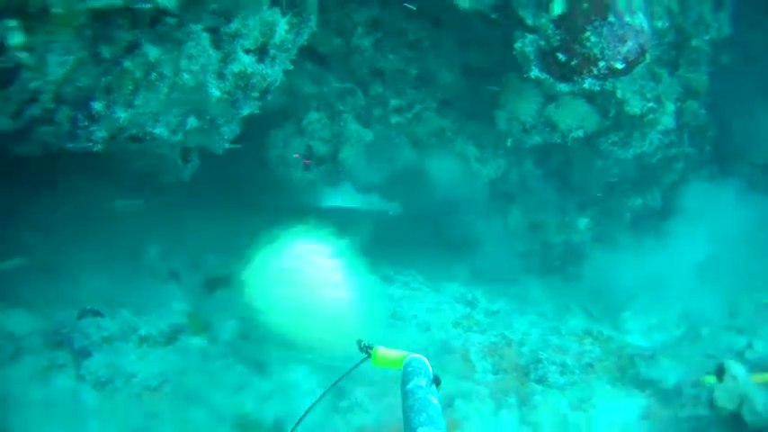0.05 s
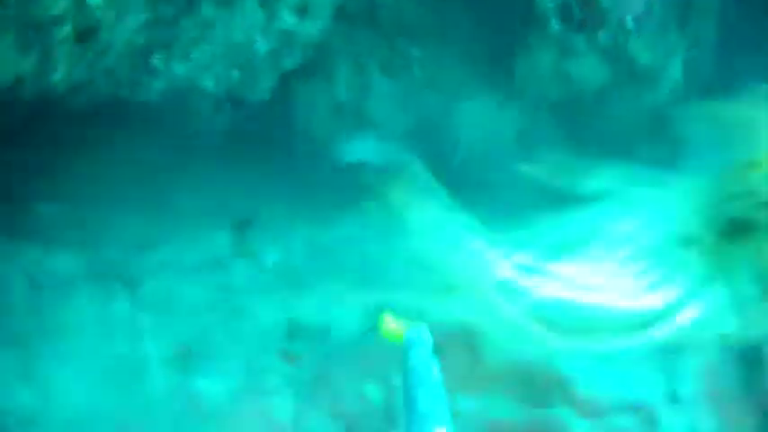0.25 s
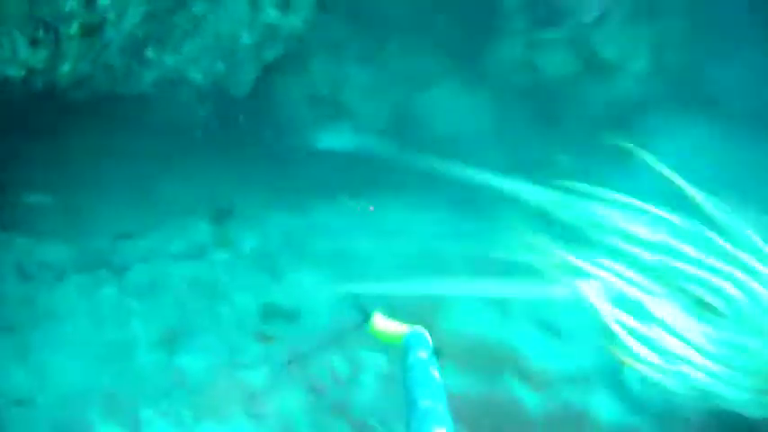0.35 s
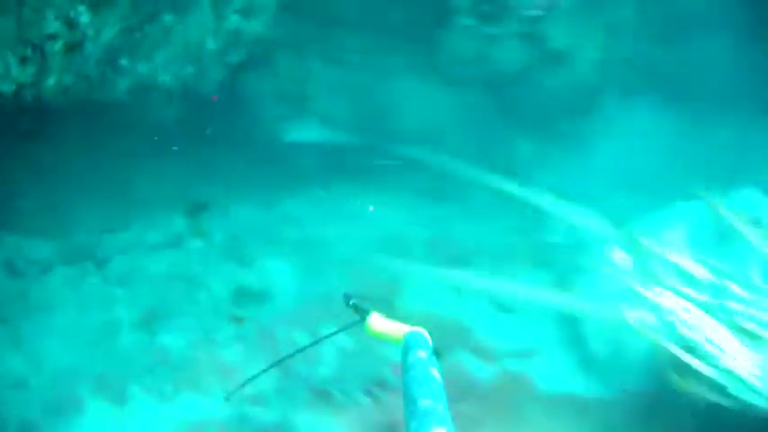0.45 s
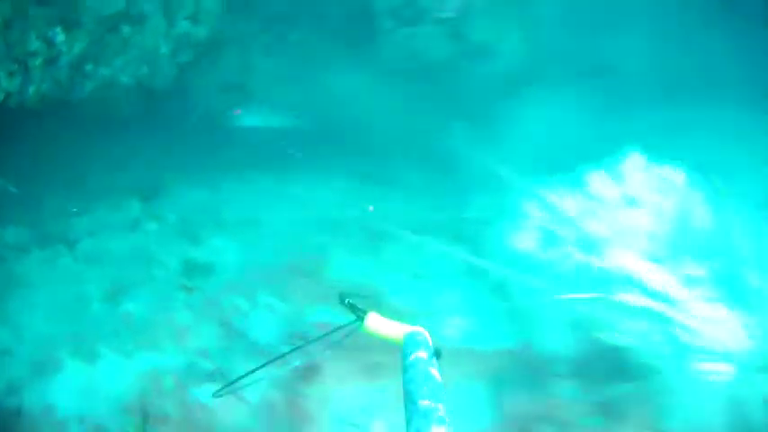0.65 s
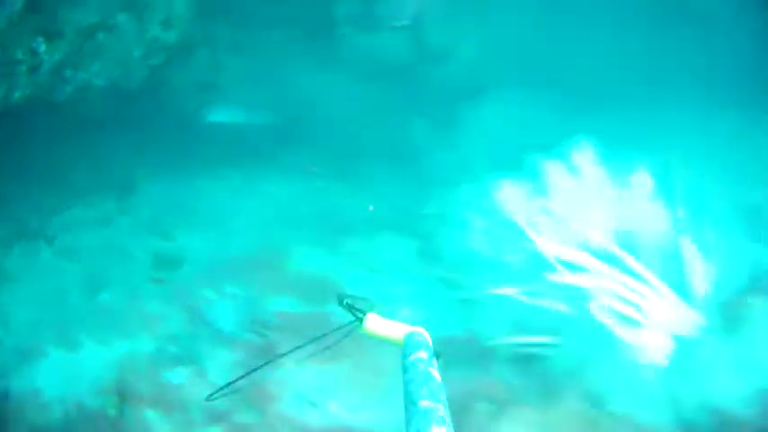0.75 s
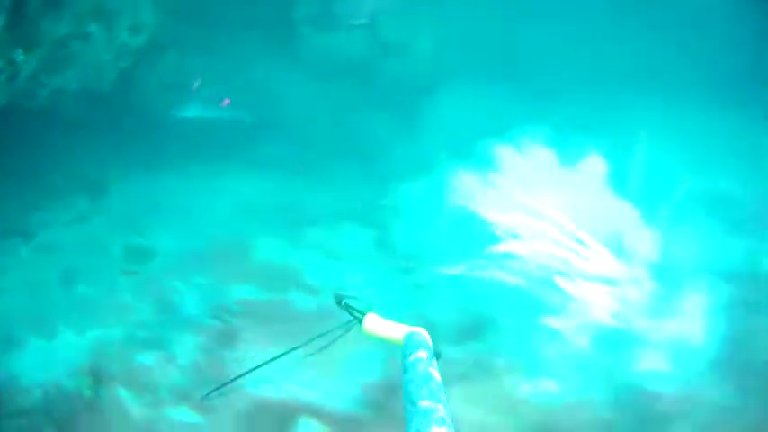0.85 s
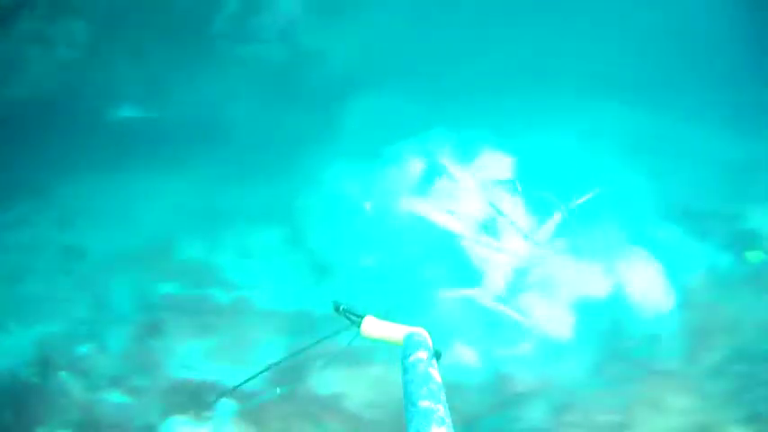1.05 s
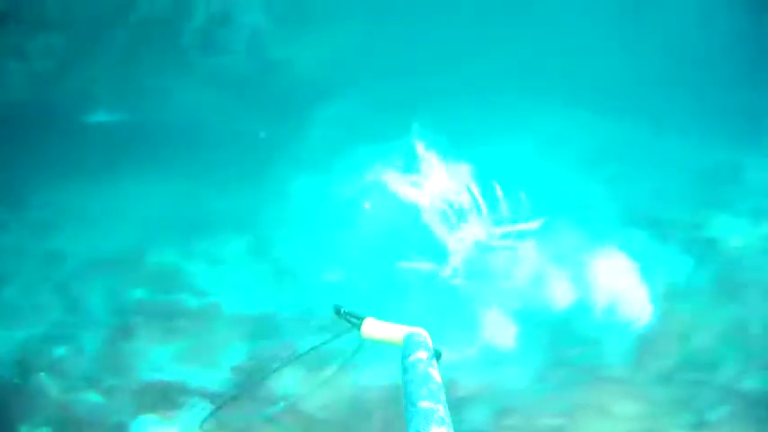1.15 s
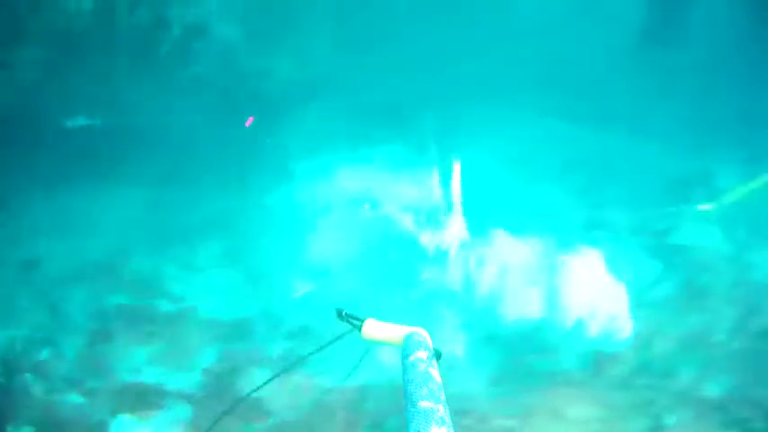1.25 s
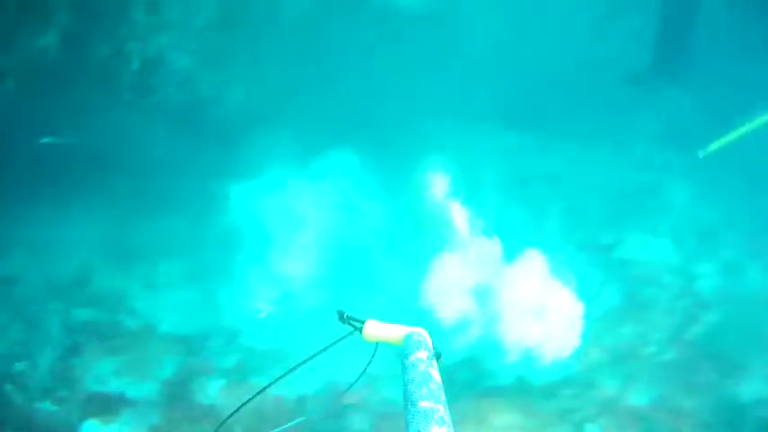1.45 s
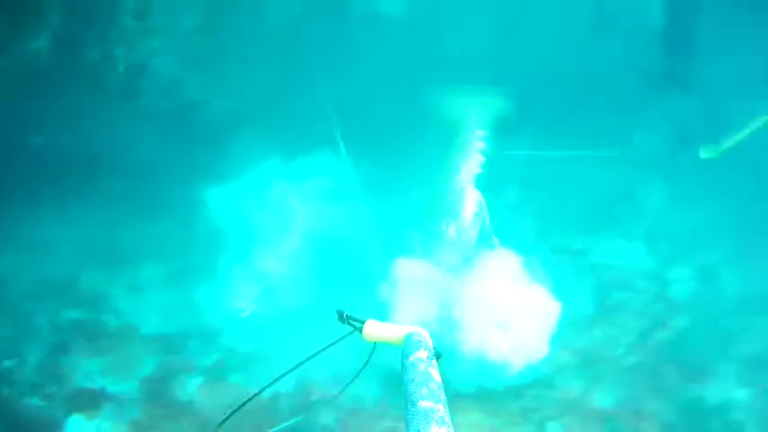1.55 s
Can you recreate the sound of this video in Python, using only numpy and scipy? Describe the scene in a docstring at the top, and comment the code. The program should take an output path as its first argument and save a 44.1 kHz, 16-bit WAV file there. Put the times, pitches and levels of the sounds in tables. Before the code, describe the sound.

A violent underwater thrash thumps a pole, followed by snaps, rustles and ratcheting line.

```python
"""Under water, beside a camera on a pole with a snare line, over the faint crackle of the seabed.
The gear scrapes; at 0.2 s a violent thrash knocks the pole, shoves water against the housing and
thumps it, overloading the microphone. A sharp snap follows at 0.4 s, then pinging rubs, dry cracks
and scattered bubbles. From 1 s on the line is dragged out in three short ratcheting runs, with gritty
rustles and a cluster of smaller snaps before the last run."""
import sys
import numpy as np
from scipy import signal
from scipy.fft import rfft, irfft
from scipy.io import wavfile
from scipy.ndimage import uniform_filter1d

SR = 44100
rng = np.random.default_rng(int(sys.argv[2]) if len(sys.argv) > 2 else 0)


def output_pcm(signal):
    """Save a mono or channel-first signal as 16-bit PCM at the path in sys.argv[1].

    Samples are clipped to [-1, 1] before scaling.
    """
    pcm = np.clip(np.atleast_2d(signal).T, -1, 1) * 32767
    wavfile.write(sys.argv[1], SR, np.round(pcm).astype(np.int16))


N = 70560
T = np.arange(N) / SR

# soft wash of the seabed (frequency [Hz], gain [dB])
SEA_EQ = [(180, -25.5), (400, -25), (650, -8.5), (1000, 9), (1400, -11.5), (2100, 2), (2700, -9.5),
          (5500, -4.5), (7200, -8), (10000, -17), (12500, -11), (16000, -39)]
# hollow ring of the housing (frequency [Hz], level [dB], decay [s])
HOUSING_MODES = [(892, -37.5, 0.008), (1048, -36, 0.014), (6780, -33, 0.0011), (8340, -35, 0.0016)]
# ring of the pole and its fittings (frequency [Hz], relative level [dB], decay [s])
POLE_MODES = [(668.3, -38, 0.016), (914, -51.5, 0.014), (1627, -48, 0.01), (1840, -56, 0.0063),
              (2220, -44, 0.0074), (4000, -43.5, .006), (5100, -46.5, 0.0044)]
# stereo lean (frequency [Hz], left minus right [dB])
BALANCE = [(60, -5.5), (110, -8), (200, 4.5), (380, 9), (700, 11), (1290, 6.5), (2380, 6.5), (4400, 6),
           (8120, 5.5), (15000, 2)]
# bubble plops and short ringing pings of knocks and rubs (time [s], level [dB], pitch [Hz], decay [s])
PLOPS_AND_PINGS = [(0.119, -50.5, 1096, 0.0057), (.291, -24, 1815, 0.0039), (.513, -35, 2014, 0.0024),
                   (.533, -34, 2230, 0.0025), (.595, -46.5, 381, 0.028), (0.655, -33, 1152, 0.0055),
                   (.663, -42.5, 984, 0.0042), (.707, -44, 2170, 0.0037), (.714, -44.5, 1075, 0.0069),
                   (.716, -51, 675, 0.0081), (.8419, -40.5, 2000, 0.0024), (.895, -48.5, 710, .009),
                   (.95, -37, 2050, 0.0019), (1.11, -48, 374, 0.026), (1.224, -34.5, 2345, 0.0046),
                   (1.528, -41.5, 2346, 0.0025), (1.552, -58, 560, 0.015)]
# dry cracks of grit and shell (time [s], level [dB])
CRACKS = [(.029, -29), (.3215, -22), (.4195, -20.5), (.428, -38), (.4372, -24), (.5995, -21.5),
          (.6055, -18.5), (.618, -12.5), (.7315, -30.5), (.7935, -27.5), (.821, -38), (.8424, -31)]
# bright tone of a crack (frequency [Hz], gain [dB])
CRACK_EQ = [(500, -23.5), (2200, -3.5), (6500, 6), (9500, -18), (16000, -28)]
# snaps of line and shell (time [s], level [dB], pitch [Hz])
SNAPS = [(.116, -31.5, 2920), (.3903, -9, 3274), (1.3524, -24, 3230), (1.356, -33, 3220),
         (1.363, -33.5, 3400), (1.367, -33, 3600), (1.372, -37, 3460)]
# partials of a snap (multiple of the pitch, relative level [dB], decay [s])
SNAP_MODES = [(1.001, -3, 0.0012), (1.19, -9.5, 0.0012), (1.41, -14, .002), (1.61, -13, .002)]
# gritty rustles of the line (time [s], relative level [dB], hold [s], decay [s])
RUSTLES = [(.183, -31.5, 0.0014, 0.014), (.202, -32.5, 0.0069, 0.0026), (.284, -48.5, 0.078, 0.061),
           (.415, -51, 0.0083, 0.067), (.553, -48.5, 0.0051, 0.016), (.615, -40.5, 0.0067, 0.033),
           (.73, -53, 0.09, 0.0061), (.885, -54, 0.2, 0.014), (.988, -57, 0.042, 0.011),
           (1.019, -42.5, 0.048, 0.012), (1.1, -50.5, 0.22, 0.017), (1.252, -41, 0.029, 0.012),
           (1.347, -44.5, 0.017, 0.0058), (1.452, -39, 0.019, 0.01)]
# crisp tone of the rustles and the seabed crackle (frequency [Hz], gain [dB])
GRIT_EQ = [(200, -29), (500, -6.5), (950, -6), (1350, -14), (2100, 4), (2800, -6.5), (4200, -3),
           (5500, 3.5), (7000, 1.5), (9500, -11), (12500, -13), (16000, -33.5)]
# line and gear rubbing on the pole (time [s], relative level [dB], hold [s], decay [s])
RUBS = [(.035, -57, 0.058, 0.041), (.1825, -28, 0.0059, 0.014), (.2, -22.5, 0.02, .006),
        (.221, -27, 0.0033, 0.0028), (.265, -26.5, 0.0073, 0.011), (.291, -29, 0.0012, 0.0017),
        (.312, -34.5, 0.0088, .004), (.331, -35.5, .008, 0.0061), (.513, -37, 0.0023, 0.0059),
        (.533, -38.5, 0.0028, 0.0056), (.548, -41.5, 0.0017, 0.02), (.575, -43.5, 0.0088, 0.0093),
        (.599, -40.5, 0.022, 0.012), (1.11, -35.5, 0.00088, 0.0053), (1.128, -46.5, 0.011, 0.014),
        (1.16, -51, 0.0041, 0.0097)]
# scraping tone of a rub (frequency [Hz], gain [dB])
RUB_EQ = [(150, -20), (380, 1), (520, -3.5), (700, -28), (1150, -15.5), (1450, 3), (2200, 5.5),
          (2600, -6.5), (4200, -3.5), (7000, -9), (9000, -27), (13000, -40), (16000, -45.5)]
# single ticks as the line creeps (time [s], relative level [dB])
TICKS = [(.0695, -21), (.6545, -19), (.991, -24), (.997, -24), (1.0023, -28), (1.008, -22), (1.0123, -25),
         (1.0644, -18), (1.0707, -17), (1.0805, -25), (1.1444, -22), (1.1527, -22), (1.1596, -21),
         (1.2814, -19), (1.2882, -23), (1.2908, -22), (1.2957, -26), (1.3033, -24), (1.3064, -27),
         (1.3155, -26), (1.4419, -22), (1.4529, -21), (1.4564, -19), (1.4619, -12), (1.4673, -17),
         (1.5174, -27)]
# runs of the line (start [s], end [s], first rate [ticks/s], last rate [ticks/s], relative level [dB])
RUNS = [(1.0211, 1.059, 325, 500, -14), (1.2518, 1.2765, 410, 455, -14), (1.4742, 1.51, 310, 225, -16)]
# thin, glassy tone of a tick (frequency [Hz], gain [dB])
TICK_EQ = [(200, -55), (600, -29.5), (900, -32), (1350, -22), (2200, -3), (2650, -16.5), (3100, -2.5),
           (4400, -18.5), (5100, 4), (5700, 1.5), (6100, -2.5), (6600, 6.5), (7200, 4.5), (7750, -13.5),
           (8300, -1), (9200, -9.5), (11000, -22.5), (12100, -5), (13200, -18), (16000, -23)]
# tugs on the pole (time [s], level [dB])
TUGS = [(0.249, -21), (0.628, -48.5), (1.11, -54)]
# envelopes of water shoved against the housing (time [s], rumble level [dB], churn level [dB])
SURGE = [(0, -65, -62), (.1, -68, -61.5), (0.179, -70, -70.5), (.187, -35.5, -22), (0.204, -27.5, -27),
         (0.23, -26, -24), (.24, -16, -8.5), (.256, -18, -23), (.275, -23, -31.5), (.305, -39, -38.5),
         (.37, -38, -47), (.47, -59, -72), (.645, -55, -63), (.72, -59.5, -83), (.95, -61.5, -77),
         (1.13, -60.5, -70.5), (1.22, -63, -85), (1.6, -70.5, -79)]
# deep rumble of that water (frequency [Hz], gain [dB])
RUMBLE_EQ = [(12, -9), (27, 1), (60, 0), (85, -2), (125, -14), (300, -45), (3000, -110)]
# its low-mid churn (frequency [Hz], gain [dB])
CHURN_EQ = [(60, -19.5), (140, 2), (260, 0), (400, -8), (560, -13.5), (800, -26), (3000, -42),
            (16000, -100)]
# body of the heavy thump (frequency [Hz], level [dB], decay [s])
THUMP_MODES = [(48, 7.5, 0.011), (121.5, -8.5, 0.011), (205, -7, 0.0065)]
# hard knocks of the thrash (time [s], relative level [dB], hold [s], decay [s])
KNOCKS = [(.2102, -19, 0.0019, 0.0022), (.2352, -17.5, 0.0011, 0.00089), (.2368, -5, 0.0023, 0.0026),
          (.2468, -5, 0.0017, 0.0027), (.2535, -18, 0.0021, 0.0016), (.2612, -11.5, 0.00055, 0.0011),
          (.276, -28, 0.00057, 0.00089), (.278, -21, 0.0011, .0018)]
# mid-heavy tone of a knock (frequency [Hz], gain [dB])
KNOCK_EQ = [(180, -41), (300, -4), (762, -12), (1030, 0.5), (1410, -11.5), (1580, -4), (1900, 1.5),
            (2740, -12), (4520, -9), (5160, -6), (5610, -9.5), (8090, -17), (8940, -37), (11500, -24),
            (16000, -53.5)]


def amp(db):
    """Decibels to gain."""
    return 10 ** (np.asarray(db) / 20)


def unit(x):
    """Scale to rms 1."""
    return x / np.sqrt(np.mean(x ** 2))


def curve(points, size):
    """Spread (frequency [Hz], gain [dB]) points over the bins of a transform."""
    hz, db = np.array(points, float).T
    return np.interp(np.log(np.fft.rfftfreq(size, 1 / SR) + 1), np.log(hz), db)


def through(x, response):
    """Pass a sound through an impulse response."""
    return signal.fftconvolve(x, response)[:N]


def eq(x, points, size=8192):
    """Minimum-phase EQ of unit energy: shapes the tone with no ringing ahead of a hit."""
    cepstrum = irfft(np.log(amp(curve(points, size))))[:size // 2]
    cepstrum[1:] *= 2
    response = irfft(np.exp(rfft(cepstrum, size)))
    return through(x, response / np.linalg.norm(response))


def pulses(rows):
    """One impulse for each (time [s], level [dB])."""
    out = np.zeros(N)
    for at, db in rows:
        out[int(at * SR)] += amp(db)
    return out


def ring(at, hz, db, decay, sag=0, attack_cycles=.67):
    """A damped tone that builds within its first cycle and loses the share `sag` of its pitch."""
    age = np.clip(T - at, 0, 10 * decay)
    fade = np.exp(-age / decay)
    attack = 1 - np.exp(-(age * hz / attack_cycles) ** 2)
    cycles = hz * (age - sag * (age - decay * (1 - fade)))
    return amp(db) * attack * fade * (age < 10 * decay) * np.sin(2 * np.pi * cycles)


def struck(modes, at=0):
    """All modes of a body ring from one hit."""
    return sum(ring(at, hz, db, decay) for hz, db, decay in modes)


def grit(per_s, spread_db):
    """Random tiny impacts of uneven size, rms 1."""
    size = amp(spread_db * np.minimum(rng.exponential(size=N), 3))
    return unit((rng.random(N) < per_s / SR) * size * rng.choice([-1, 1], N))


def bursts(rows, tone, per_s, spread_db, attack_s=.00024):
    """Spurts of stick-slip grit that rise, hold and die away."""
    envelope = np.zeros(N)
    for at, db, hold, decay in rows:
        attack = np.clip((T - at) / attack_s, 0, 1)
        envelope += amp(db) * attack * np.exp(-np.maximum(T - at - hold, 0) / decay)
    return eq(envelope * grit(per_s, spread_db), tone)


def seabed():
    """The bed of the scene: a soft wash with scattered crackle."""
    wash = amp(-65) * eq(rng.standard_normal(N), SEA_EQ)
    crackle = amp(-68) * eq(grit(per_s=200, spread_db=4.5), GRIT_EQ)
    return wash + crackle


def housing_echoes(x, echo_s=.001285, echo_db=-15.5, tail_s=.0068, tail_db=-17.5, width_db=-30):
    """One quick reflection and a brief rattle of echoes in the case, partly different on each side."""
    size = 2048
    envelope = np.exp(-T[:size] / tail_s) * (1 - np.exp(-T[:size] / echo_s))
    tails = rng.standard_normal((3, size)) * envelope
    shared, left, right = tails / np.linalg.norm(tails, axis=1, keepdims=True)
    centre = pulses([(0, 0), (echo_s, echo_db)])[:size] + amp(tail_db) * shared
    return np.array([through(x, centre + amp(width_db) * side) for side in (left, right)])


def housing_ring(x):
    """The housing answers a sound with a hollow ring."""
    return through(x, struck(HOUSING_MODES))


def pole(push):
    """The pole passes on knocks and rubs and rings after them."""
    return push + amp(-5) * through(push, struck(POLE_MODES))


def plops_and_pings(roughness=.55, flutter_s=.0018):
    """Bubbles plop, knocks and rubs ping: short tones whose level flutters and whose pitch sags."""
    flutter = unit(uniform_filter1d(rng.standard_normal(N), int(flutter_s * SR)))
    tones = sum(ring(at, hz, db, decay, sag=.15) for at, db, hz, decay in PLOPS_AND_PINGS)
    return (1 + roughness * flutter) * tones


def cracks():
    """Grit and shell crack in single dry, bright clicks."""
    return eq(pulses(CRACKS), CRACK_EQ)


def snaps(low_cut_hz=2280):
    """Line and shell snap hard, ring for a few cycles and carry no bass."""
    rings = sum(ring(at, hz * multiple, db + partial_db, decay)
                for at, db, hz in SNAPS for multiple, partial_db, decay in SNAP_MODES)
    return signal.sosfilt(signal.butter(3, low_cut_hz, "high", fs=SR, output="sos"), rings)


def rustles():
    """The line rustles in coarse, uneven grains that set the housing ringing."""
    grains = amp(-3.5) * bursts(RUSTLES, GRIT_EQ, per_s=2600, spread_db=5)
    return grains + housing_ring(grains)


def rubs():
    """Line and gear stick and slip on the pole in fine-grained scrapes."""
    return amp(-3.5) * bursts(RUBS, RUB_EQ, per_s=5000, spread_db=2)


def ratchet(edge_db=-6, weak_db=-5, scatter_db=2.2, jitter=.06):
    """The dragged line ticks singly or in runs that speed up or slow down; the housing rings hollow."""
    ticks = list(TICKS)
    for start, end, first_rate, last_rate, db in RUNS:
        at = start
        for k, (late, loud) in enumerate(rng.standard_normal((64, 2))):
            if at >= end:
                break
            progress = (at - start) / (end - start)
            swell_db = edge_db * (1 - np.sin(np.pi * progress))  # loudest mid-run
            accent_db = weak_db * (k % 2) + scatter_db * loud  # strong and weak ticks alternate
            ticks.append((at, db + swell_db + accent_db))
            at += (1 + jitter * late) / (first_rate + (last_rate - first_rate) * progress)
    train = amp(.5) * pulses(ticks)
    return eq(train, TICK_EQ) + housing_ring(train)


def booms():
    """Each tug sets the pole booming; the note drops as the strain eases."""
    return sum(ring(at, hz=95, db=db, decay=.06, sag=.3) for at, db in TUGS)


def surge(thump_s=.2315):
    """The weight of the thrash: churning water and one heavy thump that leaves the pole shaking."""
    times, rumble_db, churn_db = np.array(SURGE).T
    rumble = amp(np.interp(T, times, rumble_db)) * eq(rng.standard_normal(N), RUMBLE_EQ)
    churn = amp(np.interp(T, times, churn_db)) * eq(rng.standard_normal(N), CHURN_EQ)
    return rumble + churn - struck(THUMP_MODES, at=thump_s)


def knocks():
    """The bite of the thrash: bursts of grit so short and dense that they land as hard hits."""
    return amp(1) * bursts(KNOCKS, KNOCK_EQ, per_s=12000, spread_db=1)


def scene():
    """Gear and seabed echo in the case, the other layers stay dry; bass leans right, the rest left."""
    gear = pole(knocks() + rubs()) + rustles() + cracks() + ratchet() + snaps()
    mix = housing_echoes(gear + seabed()) + plops_and_pings() + surge() + booms()
    lean_db = curve(BALANCE, 2 * N) * np.array([[1], [-1]]) / 2
    return irfft(rfft(mix, 2 * N) * amp(lean_db))[:, :N]


def record(dry, drive_db=1.5, dc_offset=.0019, dull_hz=13160, high_cut_hz=15800):
    """The microphone chain sits slightly off zero, clips the thrash flat, then dulls and cuts the top."""
    clipped = np.clip(dry * amp(drive_db) + dc_offset, -1, 1)
    dulled = signal.sosfilt(signal.butter(2, dull_hz, fs=SR, output="sos"), clipped)
    return signal.sosfilt(signal.ellip(8, .2, 70, high_cut_hz, fs=SR, output="sos"), dulled)


dry = scene()
out = record(dry)
output_pcm(out)
```